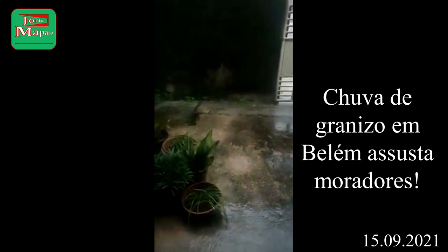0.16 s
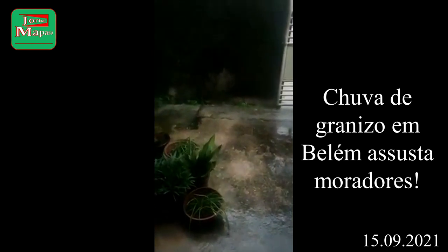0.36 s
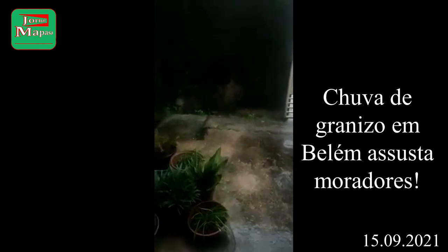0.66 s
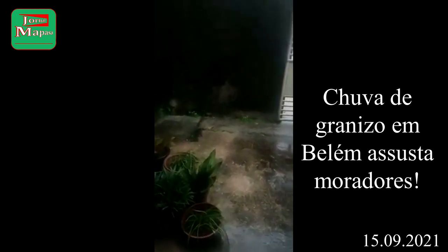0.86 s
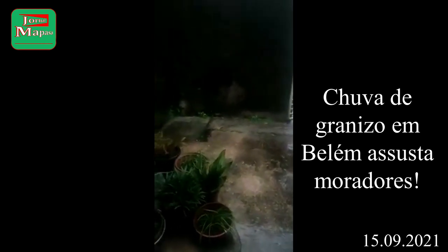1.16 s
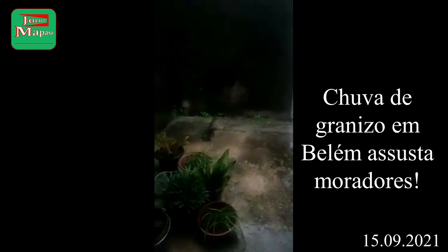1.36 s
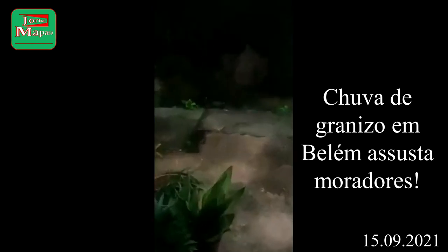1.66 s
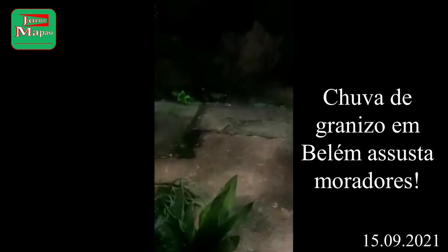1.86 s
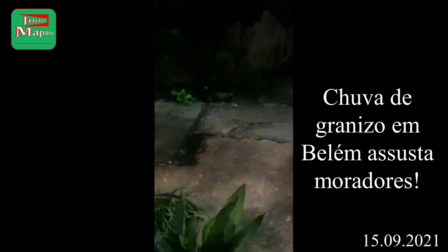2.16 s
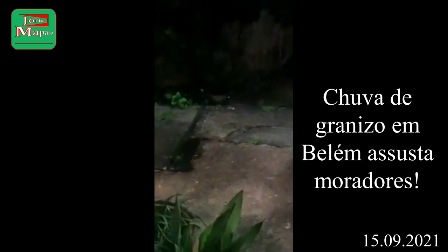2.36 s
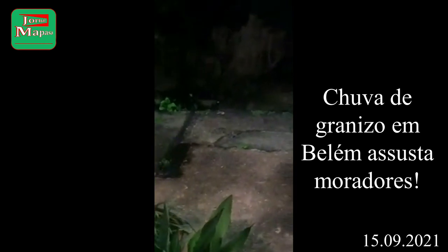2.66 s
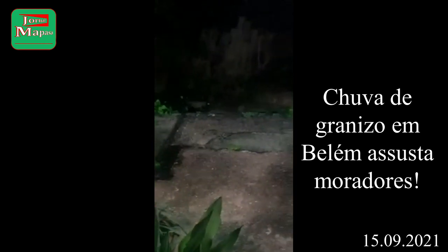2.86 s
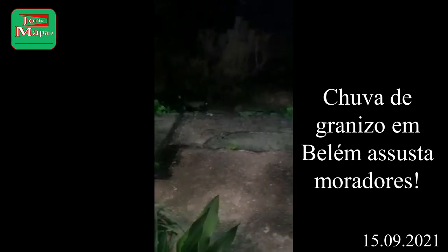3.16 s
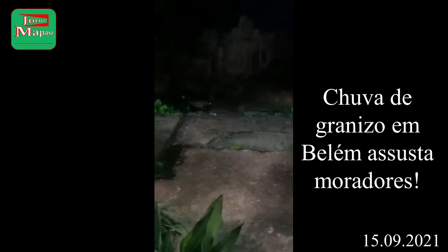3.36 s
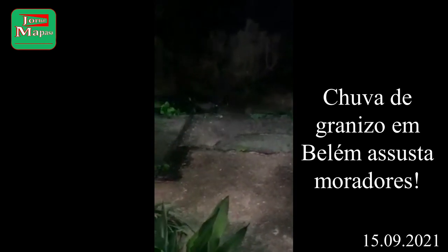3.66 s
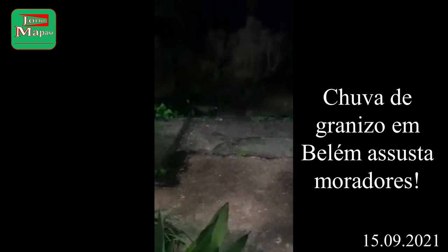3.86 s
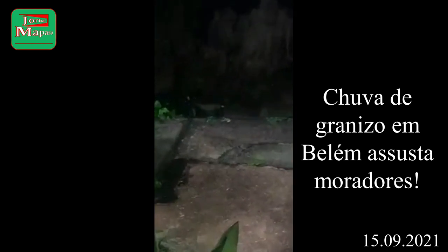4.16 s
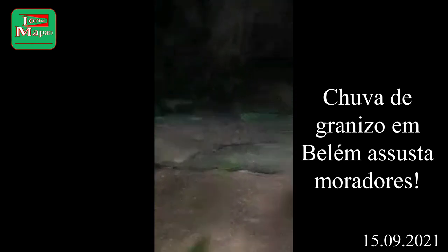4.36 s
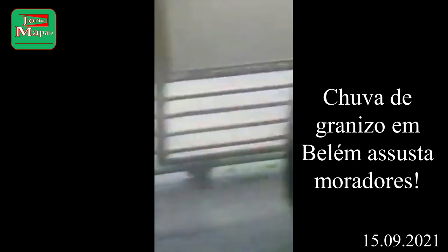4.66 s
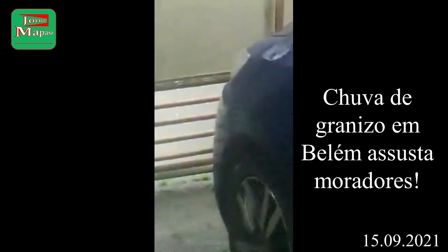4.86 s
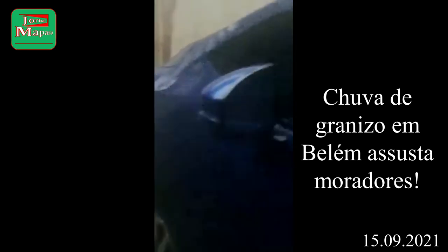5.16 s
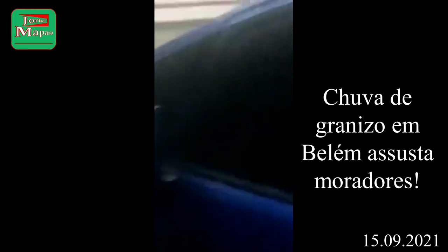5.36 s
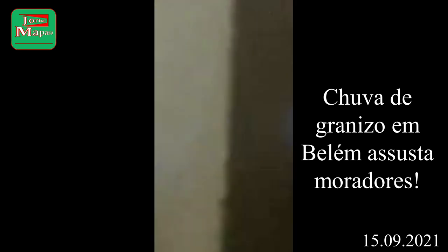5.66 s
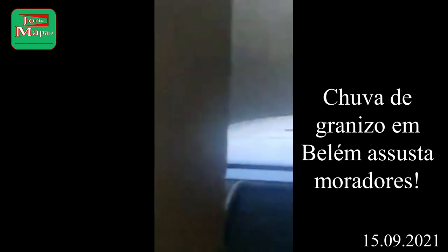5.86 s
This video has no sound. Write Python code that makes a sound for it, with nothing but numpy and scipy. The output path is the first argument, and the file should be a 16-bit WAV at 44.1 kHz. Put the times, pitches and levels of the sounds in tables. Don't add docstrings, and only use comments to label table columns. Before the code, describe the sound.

A steady, loud hiss of heavy rain fills a paved yard with potted plants, swelling slightly with gusts. Handfuls of hail clatter sharply through it over a low distant drone. Around the middle, large stones rap quickly on a hollow lid. Near the end thunder growls and rolls. Close, rough phone pickup in stereo, compressed, with watery, thin treble.

```python
import sys
import numpy as np
from scipy import signal
from scipy.fft import rfft, irfft
from scipy.io import wavfile
from scipy.ndimage import uniform_filter1d, minimum_filter1d

SR = 44100
rng = np.random.default_rng(int(sys.argv[2]) if len(sys.argv) > 2 else 0)


def inscribe(sig):
    pcm = np.round(np.clip(np.atleast_2d(sig).T, -1, 1) * 32767)
    wavfile.write(sys.argv[1], SR, pcm.astype(np.int16))


def invert_db(x):
    u = np.asarray(x, float) / 20
    return 10 ** u


N = 265641
TIME_S = np.arange(N) / SR
HZ = np.maximum(np.fft.rfftfreq(N, 1 / SR), 1)


def rms_one(x):
    return x / np.sqrt(np.mean(np.mean(np.atleast_2d(x), axis=0) ** 2) + 1e-20)


def in_time(rows):
    s, *columns = np.transpose(rows)
    return [np.interp(TIME_S, s, c) for c in columns]


def over_hz(rows):
    hz, *columns = np.transpose(rows)
    return np.array([np.interp(np.log(HZ), np.log(hz), c) for c in columns])


def band(spectrum, low_hz, high_hz, steep=8):
    share = 1 / (1 + (low_hz / HZ) ** steep) - 1 / (1 + (high_hz / HZ) ** steep)
    return irfft(spectrum * np.sqrt(np.maximum(share, 0)), N)


def drift(rate, channels=1):
    step = 1 + int(SR / rate / 8)
    noise = rng.standard_normal((channels, N // step + 18))
    knots = signal.lfilter(np.hanning(16), [1], noise)[:, 16:]
    return np.array([np.interp(np.arange(N) / step, np.arange(len(k)), k / k.std()) for k in knots])


def stereo(left, right, alike):
    alike = np.clip(alike, 0, .99)
    mid, side = rfft(left), rfft(right)
    return np.sqrt(1 + alike) * mid + np.sqrt(1 - alike) * side * [[1], [-1]]


def drops(per_s, spread_db, far_share):
    size = invert_db(spread_db * np.minimum(rng.exponential(1, (2, N)), 6))
    near = size * rng.choice([-1, 1], (2, N)) * (rng.random((2, N)) < per_s / SR)
    far_share = np.clip(far_share, 0, 1)
    far = rng.standard_normal((2, N))
    return np.sqrt(1 - far_share) * near / near.std() + np.sqrt(far_share) * far


def small_hail(per_s, fade_s):
    lifts = rng.exponential(1, N) * (rng.random(N) < per_s / SR)
    lifts = signal.lfilter([1], [1, -np.exp(-1 / (fade_s * SR))], lifts + 1e-18)
    return (lifts - lifts.mean()) / lifts.std()


# start in seconds, strength in dB, weight in
# dB, sparkle in dB, t60 in seconds.
HAIL_CLATTERS = [(0.478, -22, -6, -29, 0.17), (0.824, -13.5, -9.5, -35, 0.15), (1.2507, -17, -5, -37, 0.6),
                 (1.2984, -13, -12, -24, 0.47), (1.7816, -14, -5.5, -42, 0.23),
                 (2.307, -9.5, -8.5, -23, 0.18), (2.4843, -11, -5.5, -31, 0.22),
                 (2.7703, -25, 0.5, -29, 0.64), (3.5254, -14.5, -2.5, -23, 0.25),
                 (3.5746, -14, -6, -35, 0.34), (3.6112, -9, -7, -47, 0.27), (3.94, -24, -0.5, -4.5, 0.8),
                 (4.75, -7.5, -9, -43, 0.15), (5.3567, -11.5, -3, -41, 0.2),
                 (5.5172, -21.5, -11, -22, 0.42), (5.58, -17.5, -5, -15, 0.35)]


def hail(offset_db, weight_share, sparkle_share, rise_s, crack_db, crack_s):
    power = np.zeros(N)
    for s, strength_db, weight_db, sparkle_db, t60 in HAIL_CLATTERS:
        age = np.maximum(TIME_S - s, 0)
        crack = 1 + invert_db(2 * crack_db) * np.exp(-age / crack_s)
        peak_db = strength_db + offset_db + weight_share * weight_db + sparkle_share * sparkle_db
        fall = invert_db(2 * (peak_db - 6 - 60 * age / max(t60, .02)))
        power += (1 - np.exp(-age / rise_s)) * crack * fall
    return power


# time in seconds, intensity in dB, wind-blown fineness in dB.
DOWNPOUR = [(0.0, -26.5, 1.5), (0.44, -26, 0), (0.97, -22.5, -3.5), (1.41, -26, -1.5), (1.64, -26, -1),
            (2.18, -22, -0.5), (2.56, -24.5, 2.5), (2.9, -23, 0.5), (3.14, -24, 1), (3.54, -24.5, 1),
            (3.7, -25, 0), (4.29, -29, 1), (4.48, -26, 0), (4.79, -26.5, 4.5), (4.95, -23.5, -3.5),
            (5.28, -26.5, -5), (5.7, -27, -4), (6.02, -25, -3)]
CLASS_EDGES_HZ = (450, 1400, 4000, 7900, 10500)
# level at mean intensity in dB, share of intensity swing, share of fineness,
# flicker in dB, stray hail in dB.
DROP_CLASSES = [(-31, .5, -.1, 0.55, 0.07), (-29.5, 1.1, -.1, 0.9, 0.16), (-25, 1, 0, 0.9, 0.94),
                (-45, 1.1, .1, 1.5, 1.55), (-43.5, 0.47, 1, 0.15, .3)]
# offset in dB, share of weight, share of sparkle, rise in seconds.
CLATTER_IN_CLASS = [(-3, 1.6, 0, .003), (0, 1, 0.0034, .0015), (0, 0.026, 0.015, .0012),
                    (-19, 0, 0.11, 0.0013), (3, 0, 0.91, .02)]
# frequency in Hz, left and right level in dB per Hz.
PORT_COLOUR = [(501, -54.5, -60), (1440, -57, -62), (2330, -52.5, -58), (3600, -59, -62),
               (5000, -55.5, -64), (6000, -51, -66), (6450, -48, -66.5), (7000, -54, -63.5),
               (7600, -64, -63.5), (8300, -70, -65.5), (9400, -77, -66), (11480, -85, -89),
               (11720, -81.5, -81.5), (14600, -76.5, -76)]
# frequency in Hz, likeness of left and right from 0 to 1.
PORT_LIKENESS = [(300, 0.67), (600, .2), (1300, 0.025), (16000, 0.0092)]
MEAN_INTENSITY_DB = -25


def rain():
    heard = stereo(*drops(per_s=6000, spread_db=3.0, far_share=.85), over_hz(PORT_LIKENESS)[0])
    heard = heard * invert_db(over_hz(PORT_COLOUR))
    intensity_db, fine_db = in_time(DOWNPOUR)
    flurry, stray = drift(8.0), small_hail(per_s=45.0, fade_s=0.0056)
    edges, out = (*CLASS_EDGES_HZ, 20000), 0
    for low, high, drop_class, struck in zip(edges, edges[1:], DROP_CLASSES, CLATTER_IN_CLASS):
        mean_db, swing, fine, patchy_db, stray_db = drop_class
        level_db = mean_db + swing * (intensity_db - MEAN_INTENSITY_DB) + fine * fine_db
        power = invert_db(2 * level_db) + hail(*struck, crack_db=1.5, crack_s=.012)
        patches = 0.57 * flurry + drift(9.0) + 0.55 * drift(14.0, channels=2)
        wobble_db = patchy_db * patches + stray_db * stray
        out = out + rms_one(band(heard, low, high)) * np.sqrt(power) * invert_db(wobble_db)
    return out


def rumble(colour, low_hz, high_hz, level_db, lean_db, lumpy_db):
    noise = stereo(*rng.standard_normal((2, N)), alike=.8) * invert_db(over_hz(colour))
    side_db = lean_db * np.array([[.5], [-.5]])
    return rms_one(band(noise, low_hz, high_hz)) * invert_db(level_db + lumpy_db * drift(12.0) + side_db)


# frequency in Hz, level in dB per Hz.
DRONE_SPECTRUM = [(12, -46.5), (20, 3), (34, -2), (54, -9), (161, -8), (232, -10.5), (264, -7),
                  (450, -17.5), (580, -111), (990, -120)]


def drone():
    level_db = -33 + 0.5 * drift(1.5)
    return rumble(DRONE_SPECTRUM, 5, 5000, level_db, lean_db=4.9, lumpy_db=0.85)


# frequency in Hz, level in dB, t60 in seconds.
LID_MODES = [(618, -9, 0.053), (882, -10, 0.035), (975, -2, 0.087), (1240, -8, 0.066), (1127, -7.5, 0.022)]
# start in seconds, blow in dB.
LID_BLOWS = [(3.615, -14.5), (3.622, -17), (3.632, -12), (3.649, -15), (3.674, -20), (3.718, -26),
             (3.96, -25.5), (4.005, -25)]


def knocks():
    out, at = np.zeros(N), [round(s * SR) for s, db in LID_BLOWS]
    for hz, level_db, t60 in LID_MODES:
        clicks = np.full(N, 1e-18)
        clicks[at] = invert_db(np.array(LID_BLOWS)[:, 1] + level_db + 1.5 + rng.normal(0, 1.5, len(at)))
        r, w = invert_db(-60 / (np.clip(t60, .02, .09) * SR)), 2 * np.pi * hz / SR
        out += signal.lfilter([0, np.sin(w)], [1, -2 * r * np.cos(w), r * r], clicks)
    return out * invert_db(np.array([[2.2], [-2.2]]))


def thump():
    thump_db, t60_s = -6.5, .18
    s, blow_db = np.transpose(LID_BLOWS)[..., None]
    age = TIME_S - s
    fall_db = 60 * np.maximum(age, 0) / t60_s
    power = np.sum((age > 0) * invert_db(2 * (blow_db + thump_db - fall_db)), axis=0)
    noise = rms_one(band(rfft(rng.standard_normal(N)), 430, 1350))
    return np.sqrt(power) * noise * invert_db(np.array([[2.3], [-2.3]]))


# start in seconds, strength in dB, extra depth in dB.
THUNDER_ROLLS = [(4.88, -37, 10.5), (5.03, -23.5, -0.5), (5.18, -22.5, 1.5), (5.359, -21, -5.5),
                 (5.5, -20, -1.5), (5.6, -20.5, -4), (5.759, -26.5, -3.5), (5.92, -30, -7)]
# frequency in Hz, level in dB per Hz.
THUNDER_SPECTRUM = [(12, -24), (20, -4.5), (38, 4), (59, -9.5), (112, 1), (146, -4.5), (273, -2.5),
                    (450, -7.5), (767, -19.5), (900, -19), (1170, -50), (1980, -120)]


def thunder():
    rise_s, fade_s = .018, .17
    start_lean_db, end_lean_db, turn_s = 12.5, 5, 5.12
    s, strength_db, depth_db = np.transpose(THUNDER_ROLLS)[..., None]
    age = np.maximum(TIME_S - s, 0)
    shape = (1 - np.exp(-age / rise_s)) ** 2 * np.exp(-2 * age / fade_s) * 2
    growl = np.sqrt(np.sum(shape * invert_db(2 * strength_db), axis=0))
    deep = np.sqrt(np.sum(shape * invert_db(2 * (strength_db + depth_db)), axis=0))
    turned = 1 + np.exp(np.clip((TIME_S - turn_s) / 0.082, -30, 30))
    lean_db = end_lean_db + (start_lean_db - end_lean_db) / turned
    low_roll = deep * rumble(THUNDER_SPECTRUM, 5, 150, 0, lean_db, lumpy_db=2.3)
    return low_roll + growl * rumble(THUNDER_SPECTRUM, 150, 5000, 0, lean_db, lumpy_db=0.6)


def scene():
    return rain() + drone() + knocks() + thump() + thunder()


def limited(x, ceiling=.82):
    gain = minimum_filter1d(np.minimum(1, ceiling / (np.abs(x) + 1e-9)), size=401)
    return x * uniform_filter1d(gain, size=401)


FRAME = round(2048 / 48000 * SR)
GRID = 561
MID_SIDE = np.array([[1, 1], [1, -1]]) / np.sqrt(2)


def coarsely_rounded(x, steps, whim_db, size, count, finest, joint_hz, hold):
    n, k = np.arange(2 * size) + .5, np.arange(16 * count) + .5
    line_hz = k * SR / 2 / size
    basis = np.cos(np.pi / size * np.outer(n + size / 2, k))
    padded = np.pad(x, ((0, 0), (2 * size - GRID, 3 * size)))
    total = padded.shape[1] // size - 1
    sine, kaiser = np.sin(np.pi * n / (2 * size)), signal.windows.kaiser_bessel_derived(2 * size, 4 * np.pi)
    turns = drift(7.0)[0, np.arange(total + 1) * N // (total + 1)] > -.35
    slopes = np.array([sine, kaiser])[:, :size][turns * 1]
    window = np.hstack([slopes[:-1], slopes[1:, ::-1]])
    frames = np.lib.stride_tricks.sliding_window_view(padded, 2 * size, axis=1)[:, ::size][:, :total]
    lines = (frames * window) @ basis
    joint = line_hz < joint_hz
    lines[..., joint] = np.tensordot(MID_SIDE, lines[..., joint], 1)
    power = uniform_filter1d(uniform_filter1d(lines ** 2, size=48, axis=2), size=5, axis=1)
    level = np.repeat(np.sqrt(power + 1e-9)[..., 8::16], 16, axis=2)
    hz, *over_db = np.transpose(steps)
    over_db = np.array([np.interp(line_hz, hz, db) for db in over_db])[:, None]
    whim = rng.standard_normal((2, total, count)) + rng.standard_normal((total, count))
    whim = np.repeat(uniform_filter1d(whim, size=hold, axis=1), 16, axis=2)
    step = np.maximum(level * invert_db(over_db), finest) * invert_db(whim_db * whim)
    error = np.sign(lines) * np.floor(np.abs(lines) / step + .42) * step - lines
    error[..., joint] = np.tensordot(MID_SIDE, error[..., joint], 1)
    frames = (error @ basis.T) * window * 2 / size
    out = np.zeros((2, total + 1, size))
    out[:, :-1] += frames[..., :size]
    out[:, 1:] += frames[..., size:]
    return x + out.reshape(2, -1)[:, 2 * size - GRID:][:, :N]


# low and high edge in Hz, share of frames given a tone left and right,
# tone level in dB left and right.
TREBLE_STRIPS = [(7700, 8200, .78, .85, -60, -60), (8200, 8675, .3, .01, -3, -3),
                 (8900, 9475, .35, .01, -4, -3), (9475, 10400, 1, 1, -24, -6),
                 (10400, 10975, 1, 1, -30, -27), (10975, 11900, .3, .35, -7, -7),
                 (11900, 12475, .08, .08, -4, -4), (12575, 13300, .08, .1, -4, -4),
                 (13500, 14625, .1, .1, -6, -6), (15150, 15700, .92, .92, -60, -60)]


def rebuilt_treble(x):
    spectrum = rfft(x)
    out = irfft(spectrum * (HZ < 15700), N)
    for low, high, left_share, right_share, left_db, right_db in TREBLE_STRIPS:
        strip = irfft(spectrum * (HZ >= low) * (HZ < high), N)
        power = uniform_filter1d(strip ** 2, size=FRAME)
        swell = np.log(np.abs(power) / uniform_filter1d(strip ** 2, size=8 * FRAME) + 1e-9)
        mood = drift(16.0) + .6 * drift(16.0, channels=2) + 1.8 * swell
        mood = mood[:, FRAME // 2::FRAME]
        toned = np.array([m <= np.quantile(m, share) for m, share in zip(mood, (left_share, right_share))])
        toned = np.pad(np.repeat(toned, FRAME, axis=1), ((0, 0), (0, FRAME)), "edge")[:, :N]
        toned = uniform_filter1d(toned * 1., size=FRAME // 4)
        loudness = np.sqrt(2 * np.abs(power)) * invert_db(2.6 * drift(20.0, channels=2))
        loudness *= np.sqrt(loudness / loudness.mean(axis=1, keepdims=True))
        loudness *= invert_db(22 * np.clip(drift(14.0) - .9, 0, .8) * (right_db < -10))
        tone = loudness * invert_db(np.array([[left_db], [right_db]])) * np.sin(np.pi * (low + high) * TIME_S)
        out += toned * (tone - strip)
    return out


def top_cut(x):
    return signal.sosfilt(signal.butter(12, 15620, fs=SR, output="sos"), x)


# frequency in Hz, step over the local level in dB, mid and side below 4300 Hz,
# left and right above.
PHONE_ROUNDING = [(300, -12, -12), (1100, 1, 1), (3000, 6, 5), (4100, 6, 5), (4600, 5, 7), (6300, -4, 7.5),
                  (7300, 2, 5), (7800, 7, 6)]
# frequency in Hz, step over the local level in dB left and right.
SECOND_ROUNDING = [(300, -20, -16), (1000, -8, -6), (3000, -2, -2), (4500, -4, 0), (6300, -12, 2),
                   (7500, 0, 1), (9000, 3, -1), (11500, 9.3, 9.6), (15000, 8.7, 9)]


def record(dry):
    phone = coarsely_rounded(limited(dry), PHONE_ROUNDING, whim_db=3.8, size=FRAME, count=42,
                             finest=0, joint_hz=4300, hold=1)
    passed_on = coarsely_rounded(rebuilt_treble(phone), SECOND_ROUNDING, whim_db=2.5, size=1024, count=46,
                                 finest=.33, joint_hz=0, hold=2)
    return top_cut(passed_on)


dry = scene()
out = record(dry)
inscribe(out)
```